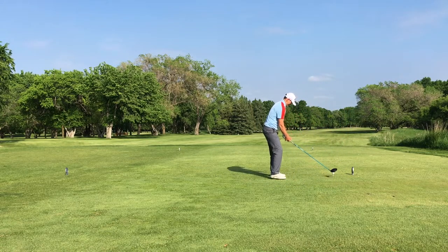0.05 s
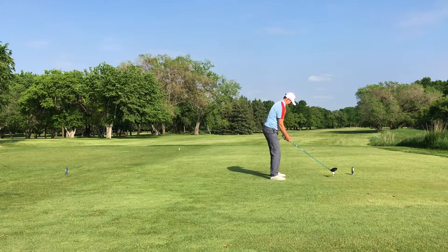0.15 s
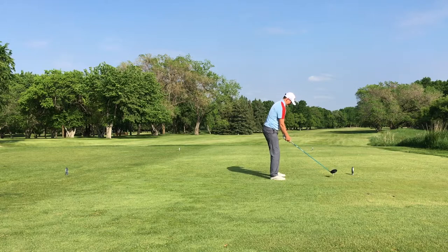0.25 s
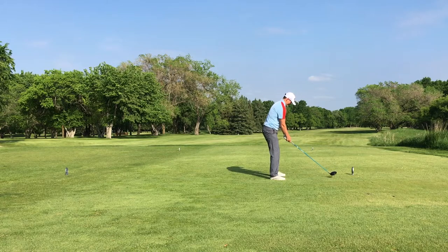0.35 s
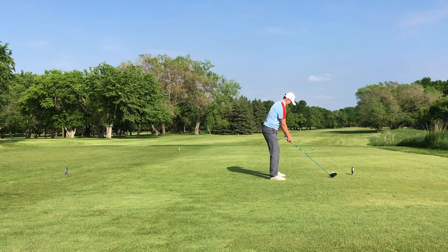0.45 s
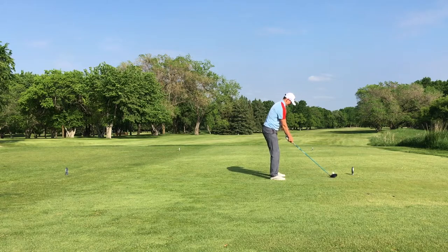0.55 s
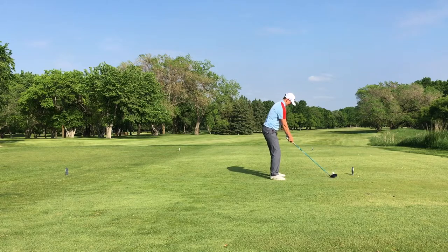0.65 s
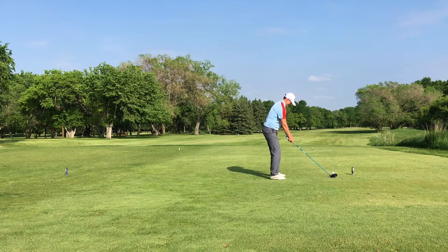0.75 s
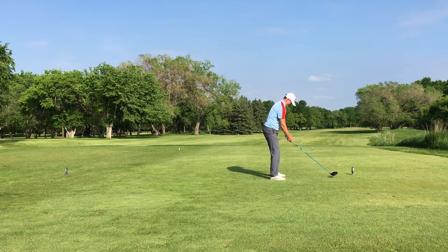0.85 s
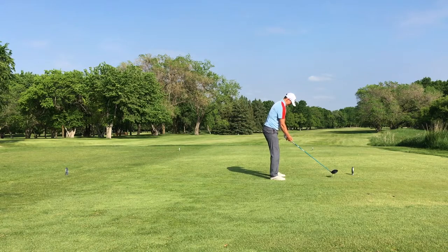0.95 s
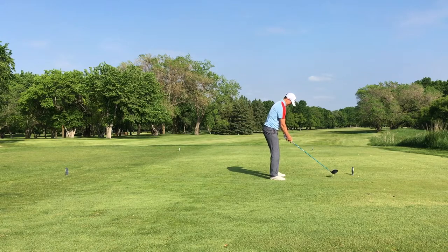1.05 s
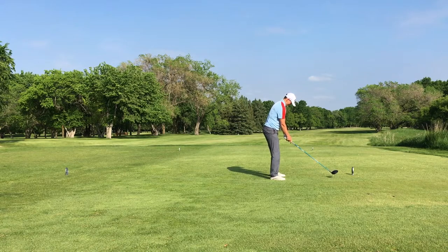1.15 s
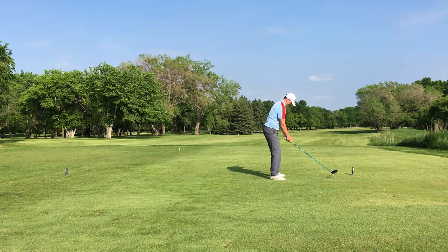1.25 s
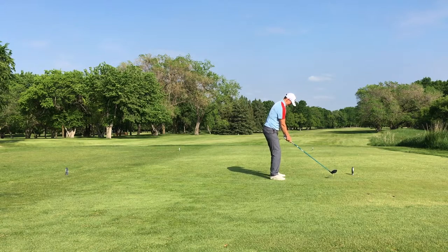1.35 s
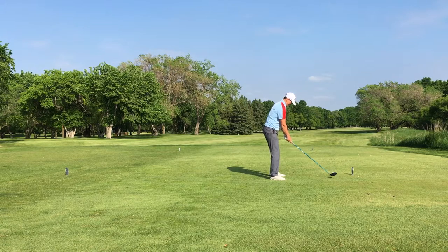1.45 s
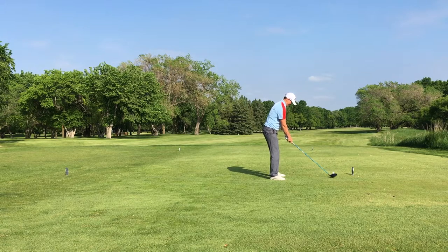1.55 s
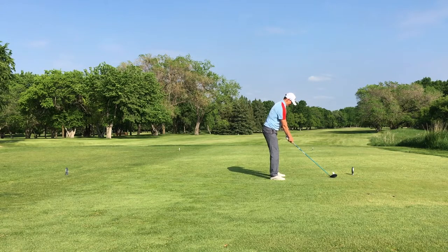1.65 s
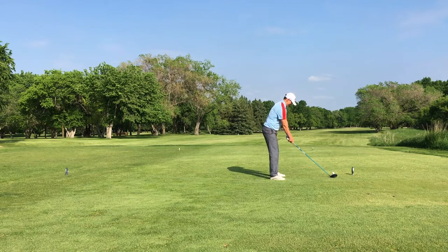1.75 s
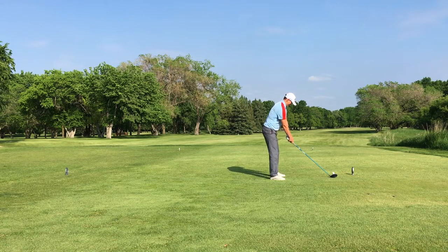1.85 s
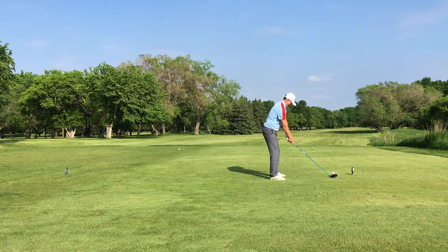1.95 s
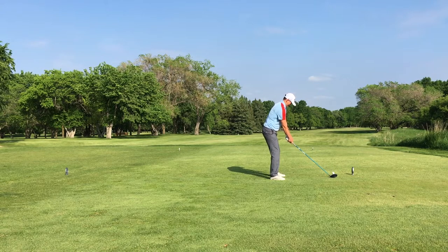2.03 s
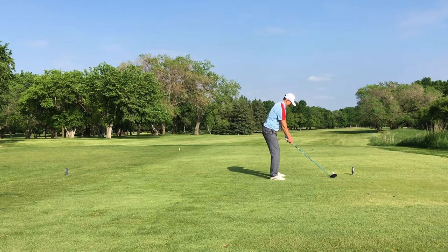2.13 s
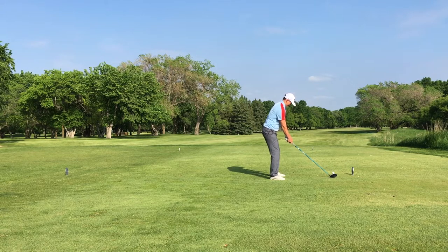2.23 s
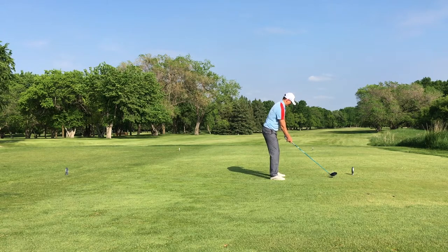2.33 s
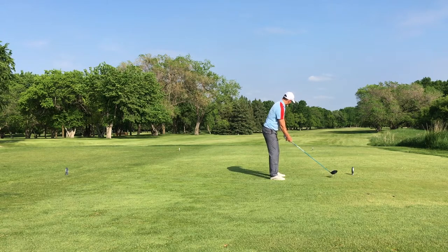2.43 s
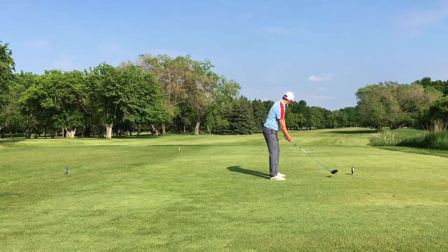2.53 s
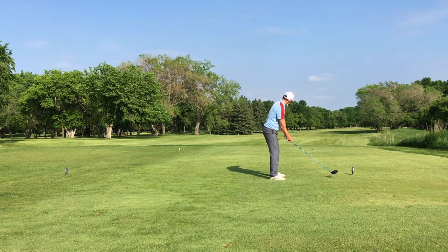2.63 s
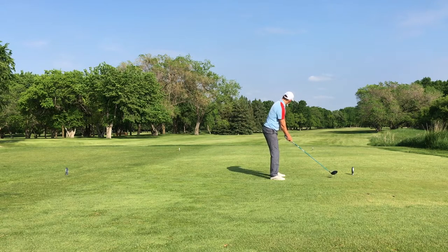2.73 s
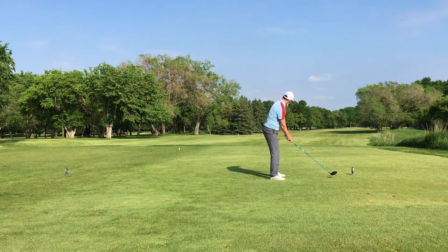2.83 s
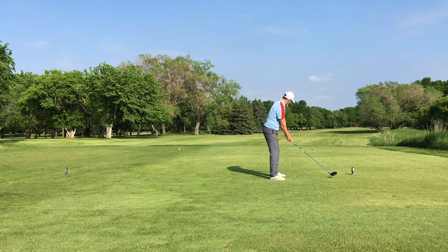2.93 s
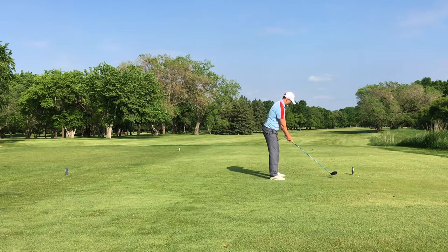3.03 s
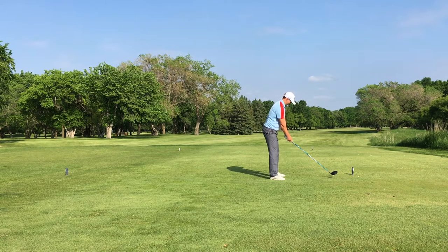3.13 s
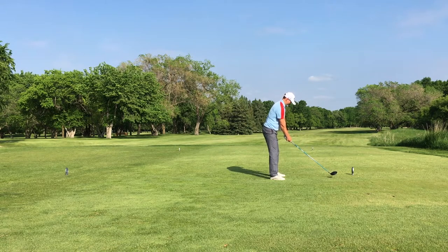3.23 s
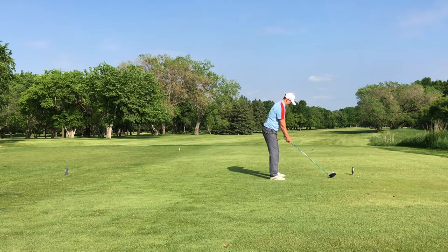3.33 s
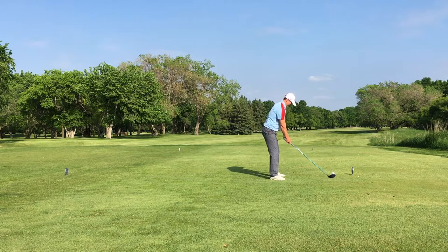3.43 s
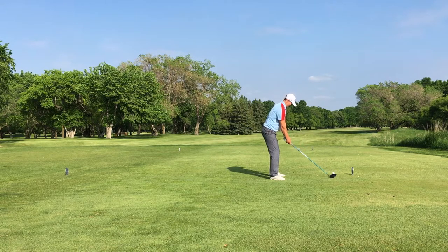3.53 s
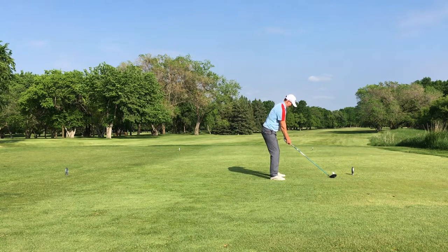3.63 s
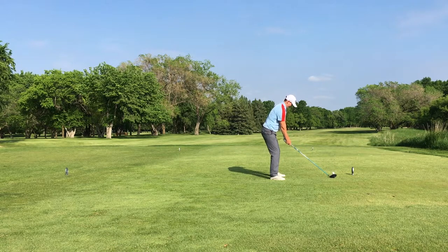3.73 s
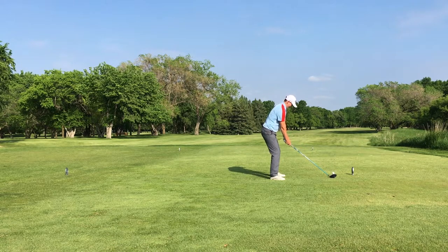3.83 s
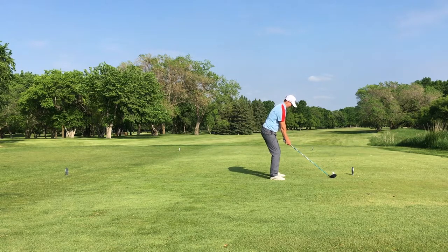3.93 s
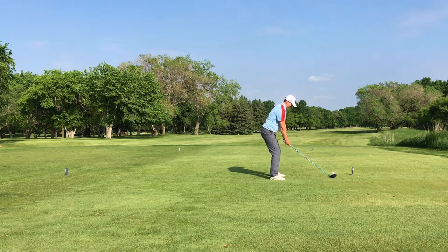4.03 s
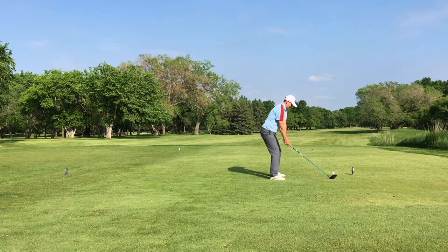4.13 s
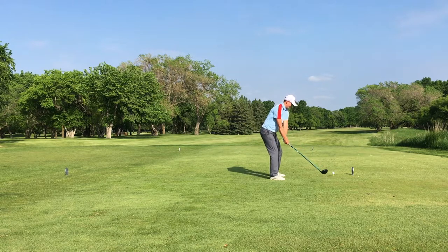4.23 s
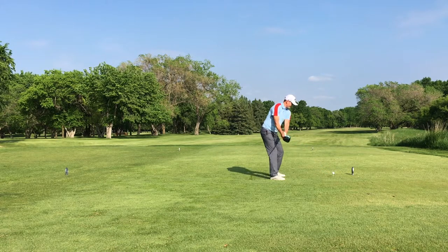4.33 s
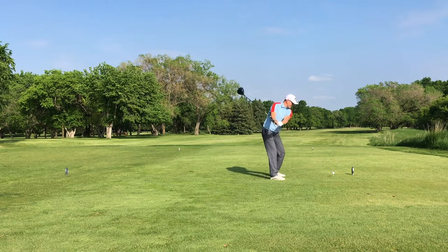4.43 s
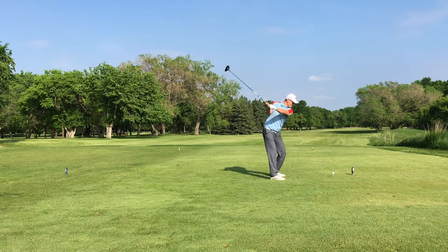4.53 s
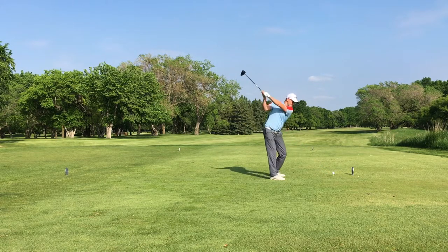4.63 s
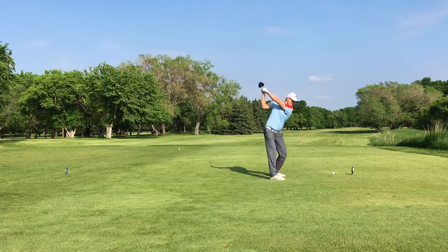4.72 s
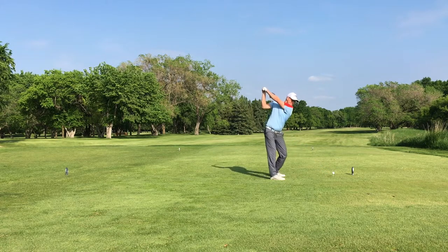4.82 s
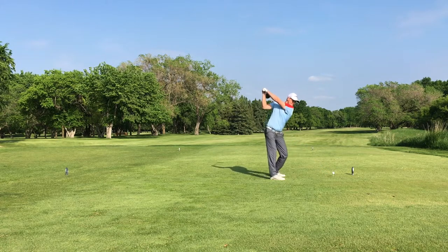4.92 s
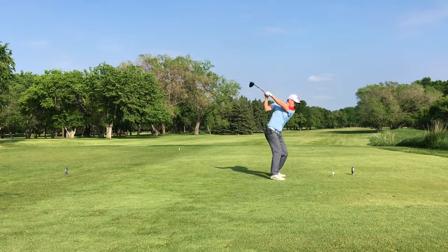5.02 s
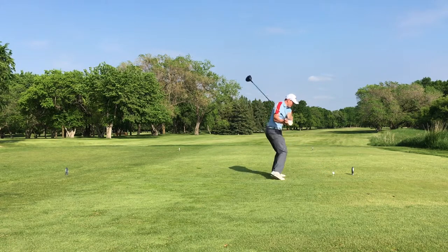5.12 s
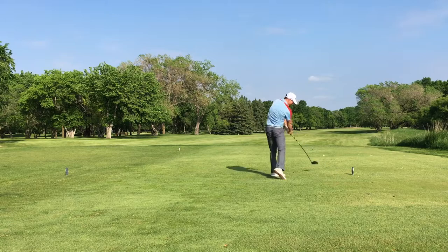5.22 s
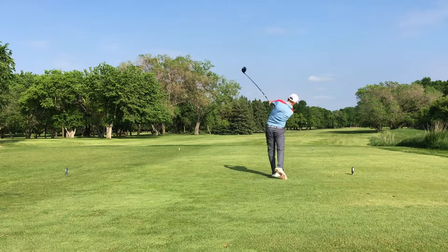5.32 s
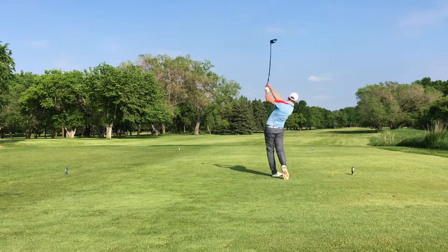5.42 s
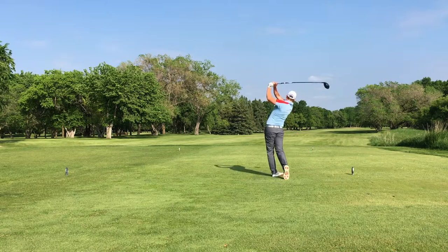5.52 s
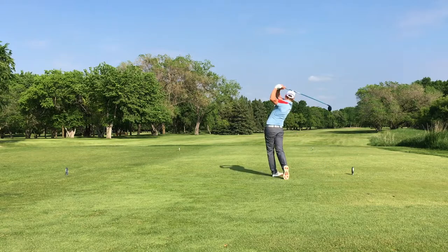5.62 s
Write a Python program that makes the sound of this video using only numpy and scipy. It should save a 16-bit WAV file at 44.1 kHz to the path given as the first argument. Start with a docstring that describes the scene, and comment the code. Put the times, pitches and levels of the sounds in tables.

```python
"""A golf drive: the club swishes down, its hollow metal head cracks against the ball and rings,
and the trees lining the course throw the crack back as a bright wash.
Before the shot, a songbird whistles four phrases of gliding, near-pure tones and others answer
from deeper in the wood. A breeze buffets the microphone over the hum of open country;
a far mower swells as the golfer's clothes brush into the backswing."""
import sys
import numpy as np
from scipy import signal
from scipy.fft import rfft, irfft
from scipy.io import wavfile
from scipy.ndimage import uniform_filter1d

SR = 44100
rng = np.random.default_rng(int(sys.argv[2]) if len(sys.argv) > 2 else 0)


def master_out(mix):
    """Clip the mix to full scale and print it as 16-bit PCM to the path in sys.argv[1]."""
    frames = np.transpose(np.atleast_2d(mix))
    ceiling = np.clip(frames, -1, 1)
    pcm = np.round(ceiling * 32767).astype(np.int16)
    wavfile.write(sys.argv[1], SR, pcm)


N = 250047
TIME = np.arange(N) / SR
IMPACT_S = 5.26995

# partials of a bird's whistle: harmonic, gain_db
WHISTLE_PARTIALS = [(1, 0), (2, -41), (3, -46)]
# how strongly each pitch of the near bird's whistle carries: pitch_hz, gain_db
WHISTLE_CARRY = [(2200, -6), (2480, -9), (2620, -4.5), (2800, 0), (3400, -3), (3750, 5), (4060, -0.5),
                 (4180, -13.5), (4700, -5), (5050, -13.5), (5500, -5.5), (7000, -20)]


def amp(db):
    """Decibels to gain."""
    return 10 ** (np.asarray(db) / 20)


def unit(x):
    """Scales to an rms of one."""
    return x / np.sqrt(np.mean(x ** 2) + 1e-20)


def at_hz(points, hz):
    """Reads a spectrum on a log-frequency axis."""
    point_hz, value = np.transpose(points)
    return np.interp(np.log(hz + 1), np.log(point_hz + 1), value)


def add(mix, start_s, sound):
    """Mixes a sound in at start_s."""
    part = mix[max(round(start_s * SR), 0):][:len(sound)]
    part += sound[:len(part)]


def tint(x, spectrum):
    """Colours a signal with an EQ curve."""
    hz = np.fft.rfftfreq(len(x), 1 / SR)
    return irfft(rfft(x) * amp(at_hz(spectrum, hz)), len(x))


def noise(spectrum):
    """Coloured noise of rms one."""
    return unit(tint(rng.standard_normal(N), spectrum))


def drift(rate_hz):
    """Smooth random modulation of rms one."""
    hz = np.fft.rfftfreq(N, 1 / SR)
    return unit(irfft(rfft(rng.standard_normal(N)) * np.exp(-(hz / rate_hz) ** 2), N))


def country_hum(level_db=-58.5):
    """The far-off hum of open country, a low bed that swells a little."""
    # colour of the hum: freq_hz, gain_db
    colour = [(53, -33.5), (90, -5), (127, -3.5), (244, -13.5), (338, -19), (532, -21), (977, -15.5),
              (2230, -33), (3080, -32), (3910, -35.5), (16000, -48.5)]
    return amp(level_db + .5 * drift(5.1)) * noise(colour)


def wind():
    """Eddies buffet the microphone; each gust holds its strength for a moment."""
    # envelope of the breeze: time_s, level_db
    breeze_levels = [(0, -71), (.9, -78), (1.2, -58), (3.9, -57), (5.67, -63.5)]
    # rumble of the buffeting: freq_hz, gain_db
    buffet = [(20, -15.5), (45, -3.5), (75, 0), (130, -4), (200, -17), (300, -32), (600, -52),
              (2000, -78.5)]
    # single gusts: start_s, length_s, level_db
    gusts = [(1.007, 0.03, -50), (1.399, 0.066, -40), (1.563, 0.25, -40), (1.865, 0.088, -41.5),
             (2.045, 0.051, -45), (3.302, 0.31, -52.5), (3.657, .11, -48.5), (5.086, 0.19, -48.5)]
    breeze = amp(np.interp(TIME, *np.transpose(breeze_levels))) * noise(buffet)
    strength = np.zeros(N)
    for start_s, length_s, db in gusts:
        add(strength, start_s, amp(db) * signal.windows.tukey(int(length_s * SR), .4))
    eddies = noise(buffet)
    eddies /= np.sqrt(uniform_filter1d(eddies ** 2, size=1500) + 1e-6)  # even out their level
    return breeze + strength * eddies


def arch(start_s, length_s, db, crest_s, start_hz, crest_hz, end_hz,
         carry=WHISTLE_CARRY, flatness=2.5, high_hz=3500, ease=.8):
    """A note bends up to a crest and away; low notes round off, high ones are flat-topped and steep."""
    t = np.arange(0, length_s, 1 / SR)
    rising = t < crest_s
    away = np.where(rising, 1 - t / crest_s, (t - crest_s) / (length_s - crest_s))
    rounded = (np.sin(np.pi / 2 * ease * away) / np.sin(np.pi / 2 * ease)) ** 2
    drop = away ** flatness if crest_hz > high_hz else rounded
    hz = crest_hz + (np.where(rising, start_hz, end_hz) - crest_hz) * drop
    return start_s, hz, db + at_hz(carry, hz)


def flick(start_s, length_s, db, crest_s, before_hz, crest_hz, after_hz, rise_s, settle_s, squareness,
          sag_hz_per_s=2800):
    """A held note leaps up briefly and settles on a new pitch, sagging either side of the crest."""
    t = np.arange(0, length_s, 1 / SR) - crest_s
    held_hz = np.where(t < 0, before_hz, after_hz) - sag_hz_per_s * abs(t)
    leap = np.exp(-np.where(t < 0, abs(t / rise_s) ** squareness, (t / settle_s) ** 2))
    hz = held_hz + (crest_hz - held_hz) * leap
    return start_s, hz, db + at_hz(WHISTLE_CARRY, hz)


def whistles(notes, partials, waver, flutter_db, attack_s=.0048, release_s=.0021):
    """Voices notes (start_s, pitch curve, level curve) as near-pure tones that waver and flutter."""
    # lift of partials in the top treble: freq_hz, gain_db
    sheen = [(9000, 0), (12000, 11), (14000, 8)]
    out, wobble, flutter = np.zeros(N), drift(130), drift(90)
    for start_s, hz, db in notes:
        t = TIME[:len(hz)]
        span = round(start_s * SR) + np.arange(len(hz))
        phase = 2 * np.pi * np.cumsum(hz * (1 + waver * wobble[span])) / SR
        tone = sum(amp(gain_db + at_hz(sheen, k * hz)) * np.sin(round(k) * phase) * (k * hz < SR / 2)
                   for k, gain_db in partials)
        ramp = np.clip(np.minimum(t / attack_s, t[::-1] / release_s), 0, 1)
        fades = np.sin(np.pi / 2 * ramp) ** 2
        swell_db = -9 * np.exp(-t / .0069)
        taper_db = -1.5 * np.exp(-t[::-1] / .0074)
        gain = np.sqrt(2) * amp(db + swell_db + taper_db + flutter_db * flutter[span])
        add(out, start_s, gain * tone * fades)
    return out


def woods(call, wet_db, t60_s, build_s):
    """Leaves and trunks scatter a call into a soft reverb tail."""
    # leaves scatter the top treble most: freq_hz, gain_db
    leaves = [(2800, 4.5), (4000, 3.5), (6000, 6), (8500, -0.5), (11500, 13)]
    t = np.arange(SR) / SR
    tail = rng.standard_normal(SR) * amp(-60 * t / t60_s) * (1 - np.exp(-t / build_s))
    wet = signal.fftconvolve(tint(call, leaves), tail / np.linalg.norm(tail))[:N]
    return call + amp(wet_db) * wet


def near_bird():
    """Phrases of arches, flicks and raspy chips, scattered by the bird's own tree, then by the wood."""
    # arching notes: start_s, length_s, gain_db, crest_after_s, start_hz, crest_hz, end_hz
    arches = [(0.495, 0.038, -44.5, 0.024, 3144, 4760, 4140),
              (0.543, 0.088, -45.5, 0.015, 5500, 6200, 4900), (0.714, 0.025, -54, 0.021, 2600, 2760, 2750),
              (.735, 0.062, -40.5, 0.014, 2745, 2850, 2270), (0.798, 0.063, -41.5, .016, 2166, 3170, 2950),
              (0.905, 0.069, -44, 0.027, 2650, 2830, 2260), (0.966, 0.073, -42.5, 0.024, 2187, 3100, 2920),
              (2.044, 0.022, -55, 0.014, 4440, 6600, 6400), (2.091, .051, -45.5, .033, 3480, 3780, 2950),
              (2.192, .035, -42, 0.0094, 2930, 2910, 2300), (2.225, 0.018, -40.5, 0.0096, 2260, 2900, 2800),
              (2.239, .076, -41, 0.032, 2794, 3280, 2250), (3.55, 0.048, -50, 0.025, 2990, 3820, 2900),
              (3.6, 0.045, -39, 0.038, 2920, 4260, 2900), (3.638, 0.07, -41.5, 0.011, 3230, 3180, 2270),
              (4.912, 0.032, -42.5, 0.011, 2850, 3046, 2150), (4.947, 0.056, -39, 0.028, 2180, 3030, 2400),
              (5, 0.021, -40, 0.014, 2490, 2470, 2500)]
    # held notes with one upward flick: start_s, length_s, gain_db, crest_after_s,
    # before_hz, crest_hz, after_hz, rise_s, settle_s, rise_squareness
    flicks = [(2.312, 0.21, -43.5, 0.12, 2723, 4170, 3330, .043, 0.028, 4.07),
              (3.725, 0.17, -40.5, .051, 2520, 3440, 2760, 0.026, .011, 1.9),
              (5.05, 0.091, -40, 0.054, 3450, 5000, 2830, .014, .015, 1.3)]
    # raspy high chips: start_s, length_s, gain_db, crest_after_s, start_hz, crest_hz, end_hz
    chips = [(2.036, 0.036, -54, .015, 3650, 4950, 4800), (2.063, 0.031, -57, 0.0165, 4880, 5300, 3000),
             (3.233, 0.064, -57.5, 0.039, 3680, 6860, 5900), (4.717, 0.059, -56.5, .03, 3460, 6800, 5600),
             (4.733, 0.042, -51, 0.032, 3350, 5270, 3600), (4.802, .022, -44, 0.015, 2680, 5900, 3700),
             (4.821, 0.041, -50.5, 0.018, 4720, 6550, 4040)]
    # partials of a chip: harmonic, gain_db
    chip_partials = [(1, 0), (2, -32)]
    # how strongly each pitch of a chip carries: pitch_hz, gain_db
    chip_carry = [(2800, -8), (3800, 5), (5200, 0), (6000, -8), (7000, -10)]
    notes = [arch(*row) for row in arches] + [flick(*row) for row in flicks]
    song = whistles(notes, WHISTLE_PARTIALS, waver=.0056, flutter_db=1.46)
    song = woods(song, wet_db=-16, t60_s=.13, build_s=.003)
    chip_notes = [arch(*row, carry=chip_carry, flatness=2.3) for row in chips]
    rasp = whistles(chip_notes, chip_partials, waver=.01, flutter_db=3)
    rasp = woods(rasp, wet_db=-9.5, t60_s=.13, build_s=.002)
    return woods(song + rasp, wet_db=-21, t60_s=.75, build_s=.0091)


def glide(start_s, length_s, db, start_hz, end_hz, bend=1.2, edge_lift_db=2):
    """One pitch sweep that speeds up as it goes, its level dipping slightly in the middle."""
    progress = np.linspace(0, 1, int(length_s * SR))
    hz = start_hz + (end_hz - start_hz) * progress ** bend
    return start_s, hz, db + edge_lift_db * (2 * progress - 1) ** 2


def far_birds(trill_step_s=.0555, trim_db=-5):
    """A faint warble, a few thin glides and an even trill, all blurred by the trees."""
    # one long warble deep in the trees: time_s, pitch_hz, gain_db
    warble_path = [(1.055, 4450, -80), (1.1, 4000, -68), (1.118, 5750, -78), (1.145, 5100, -68),
                   (1.175, 3700, -79), (1.27, 4550, -92), (1.285, 4400, -69), (1.314, 4000, -64),
                   (1.33, 5550, -72), (1.362, 5050, -64), (1.385, 3900, -72), (1.425, 3150, -77),
                   (1.46, 3800, -67), (1.505, 5600, -75), (1.538, 7300, -84), (1.565, 5400, -68),
                   (1.595, 4600, -78), (1.68, 5700, -92), (1.703, 7400, -76), (1.728, 5200, -67),
                   (1.755, 4800, -72), (1.8, 3400, -94), (1.9, 4650, -73), (1.96, 4550, -84)]
    # another bird's glides: start_s, length_s, gain_db, start_hz, end_hz
    glides = [(1.577, 0.034, -69.5, 2980, 2000), (1.628, 0.078, -71, 3350, 2120),
              (1.719, .05, -74.5, 2280, 2570)]
    # crescendo of a trill of falling chips: time_s, gain_db
    trill_levels = [(3.04, -76), (3.61, -68)]
    times, db = np.transpose(trill_levels)
    trill = [glide(start_s, .019, np.interp(start_s, times, db), start_hz=5900, end_hz=4010)
             for start_s in np.arange(times[0], times[-1], trill_step_s)]
    times, hz, db = np.transpose(warble_path)
    t = np.arange(times[0], times[-1], 1 / SR)
    warble_hz = uniform_filter1d(np.interp(t, times, hz), size=500)
    warble = times[0], warble_hz, np.interp(t, times, db)
    notes = [warble] + [glide(*row) for row in glides] + trill
    calls = whistles(notes, WHISTLE_PARTIALS, waver=.012, flutter_db=5)
    calls = woods(calls, wet_db=-8, t60_s=.15, build_s=.002)
    return amp(trim_db) * woods(calls, wet_db=-16.5, t60_s=.47, build_s=.01)


def mower(roar_db=-1, waver=.00565):
    """A far engine swells for a second: wavering harmonics of its firing rate in a soft roar."""
    # the engine's swell: time_s, gain_db, firing_hz
    swell = [(3.9, -82, 60.5), (4.42, -64.5, 62.6), (4.7, -63.5, 63.9), (5.1, -64, 66.35),
             (5.6, -79.5, 64.3)]
    # engine orders: harmonic, gain_db
    orders = [(3, -2), (4, -9.5), (5, -6.5), (10, -7.5), (13, -9)]
    times, db, hz = np.transpose(swell)
    firing_hz = np.interp(TIME, times, hz) * (1 + waver * drift(7.6))
    phase = 2 * np.pi * np.cumsum(firing_hz) / SR
    drone = sum(amp(gain_db + 2 * drift(1.4)) * np.sin(round(k) * phase) for k, gain_db in orders)
    roar = noise([(250, 2.5), (480, 0), (750, 6), (1300, -2), (4000, -27.5)])  # freq_hz, gain_db
    return amp(np.interp(TIME, times, db)) * (drone + amp(roar_db) * roar)


def clothes(start_s=4.1, length_s=.11, level_db=-77.5):
    """One soft brush of fabric as the backswing starts."""
    # hiss of rubbing cloth: freq_hz, gain_db
    cloth = [(2000, -25), (6000, -11), (9500, 7), (15000, -11)]
    stroke = np.zeros(N)
    add(stroke, start_s, amp(level_db) * signal.windows.tukey(int(length_s * SR), .6))
    return stroke * noise(cloth)


def swish(fastest_s=5.258, peak_db=-44.5, speed_up_s=.073, pass_s=.047):
    """Turbulence behind the shaft grows with the cube of its speed, peaking just before the ball."""
    # colour of the turbulence: freq_hz, gain_db
    colour = [(100, -1), (800, 2), (1600, -5.5), (3500, -6), (7000, -10), (16000, -25.5)]
    t = TIME - fastest_s
    speed = 1 / (1 + (t / np.where(t < 0, speed_up_s, pass_s)) ** 2)
    return amp(peak_db) * speed ** 3 * noise(colour)


def mode(t, hz, db, t60_s):
    """One vibration dying away as a damped sine."""
    return amp(db - 60 * t / t60_s) * np.sin(2 * np.pi * hz * t)


def club_head(t, build_s=.0004, rise_per_s=.1, cutoff_s=.041, shimmer_db=-25, shimmer_t60_s=.11):
    """The ring builds with the ball on the face and creeps sharp as the head curves round."""
    # modes of the hollow metal head: pitch_hz, gain_db, t60_s
    modes = [(2643, -33, .06), (2850, -24, 0.028), (3268, -13, 0.015), (3680, -19, .013),
             (4072, -20, 0.066), (4319, -33, 0.085), (5192, -19.5, 0.13), (5372, -19, 0.105),
             (5430, -27, .15), (5817, -23, 0.05), (6080, -21, 0.064), (6368, -28, .1), (6743, -11.5, 0.034),
             (7000, -27, 0.085), (7289, -9, 0.024), (7531, -15, 0.028), (7752, -12, 0.022),
             (7953, -7, 0.027), (8300, -14, 0.024), (8587, -19, 0.036), (8763, -26, 0.052),
             (9192, -14, 0.02), (9597, -11, 0.016), (10743, -10, 0.015), (11735, -15, 0.02),
             (12532, -18, 0.015), (13279, -19, 0.017), (14587, -20, 0.015)]
    # countless weaker modes blurred into a shimmer: freq_hz, gain_db
    shimmer_colour = [(2300, -25.5), (4600, -11), (6400, 0), (9000, -10.5), (15000, -14)]
    bent_t = t * (1 + rise_per_s * t / 2)
    # neighbouring modes bulge in opposite directions
    ring = sum((-1) ** k * mode(bent_t, *row) for k, row in enumerate(modes))
    shimmer = amp(shimmer_db - 60 * t / shimmer_t60_s) * noise(shimmer_colour)[:len(t)]
    cutoff = np.exp(-(t / cutoff_s) ** 10)  # the ring cuts off abruptly after about 40 ms
    return (1 - np.exp(-t / build_s)) * (ring + shimmer) * cutoff


def strike(push_s=.000156, knock_t60_s=.008, ring_db=1.2, turf_s=.0046, slap_s=.055, slap_t60_s=.055):
    """The ball's sudden squash sends out a pressure pulse, a pop and a knock, and rings the head."""
    # dull knock of the squashed ball: freq_hz, gain_db
    ball = [(150, -0.5), (500, 2), (850, 17), (1700, -16), (3200, -6.5), (4500, -24)]
    t = np.arange(SR // 4) / SR
    push = amp(-5) * (1 - t / push_s) * np.exp(-t / push_s)
    pop = mode(t, hz=2000, db=-12, t60_s=.0019)  # the ball flattens and springs back once
    knock = amp(-16.5 - 60 * t / knock_t60_s) * noise(ball)[:len(t)]
    thump = mode(t, hz=160, db=-31, t60_s=.023)  # air shoved aside by the club face
    blow = push + pop + knock
    out = np.zeros(N)
    add(out, IMPACT_S, blow + thump + amp(ring_db) * club_head(t))
    add(out, IMPACT_S + turf_s, amp(-19) * blow)  # bounce off the turf
    slap = amp(-44 - 60 * t / slap_t60_s) * noise(ball)[:len(t)]
    add(out, IMPACT_S + slap_s, slap)  # the nearest trunks return the knock
    return out


def tree_line(build_s=.0067):
    """Countless leaves return the crack as a dense wash, in waves; farther trees return less treble."""
    # colour of the scattered crack: freq_hz, gain_db
    colour = [(300, -20), (1000, -20.5), (2200, -12.5), (3500, -11.5), (4900, -5.5), (5900, 1.5),
              (8400, -0.5), (10500, -6.5), (15000, -17)]
    # extra decay along the way, negative where the wash lingers: freq_hz, loss_db_per_s
    air_loss = [(4000, -15.5), (7000, 23.5), (10000, 22), (16000, 52)]
    # the head's strongest modes, raised by its speed toward the trees: pitch_hz, width_hz, boost_db
    ring_peaks = [(2950, 220, 4), (4660, 220, 8), (5550, 140, 5.5), (8250, 250, 5.5)]
    # returns from the turf, the tree line and farther stands: delay_s, gain_db, t60_s
    echoes = [(.001, -36, 0.2), (0.044, -35, 0.47), (.125, -50, 0.57), (.235, -51.5, 0.31),
              (0.329, -58, 0.74)]
    hz, frame_s, spectra = signal.stft(noise(colour), SR, nperseg=256)
    loss_db = at_hz(air_loss, hz)[:, None] * np.maximum(frame_s - IMPACT_S, 0)
    ring_db = sum(db * np.exp(-((hz - peak_hz) / width_hz) ** 2) for peak_hz, width_hz, db in ring_peaks)
    wash = signal.istft(spectra * amp(ring_db[:, None] - loss_db), SR, nperseg=256)[1][:N]
    power = np.zeros(N)
    for delay_s, db, t60_s in echoes:
        envelope = amp(db - 60 * TIME / t60_s) * (1 - np.exp(-TIME / build_s))
        add(power, IMPACT_S + delay_s, envelope ** 2)
    return wash * np.sqrt(power)


def scene():
    """The course's ambience and the drive, in mono."""
    ambience = country_hum() + mower() + wind() + near_bird() + far_birds()
    drive = clothes() + swish() + strike() + tree_line()
    return (ambience + drive)[None]


def record(dry, ceiling=.6, cutoff_hz=15900):
    """Soft overload rounds off the crack; a steep low-pass trims the very top."""
    saturated = ceiling * np.tanh(dry / ceiling)
    low_pass = signal.firwin(511, cutoff_hz, window=("kaiser", 9), fs=SR)
    return signal.oaconvolve(saturated, low_pass[None], "same")


dry = scene()
out = record(dry)
master_out(out)
```